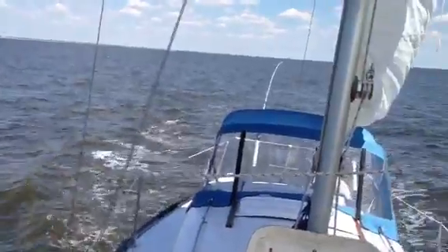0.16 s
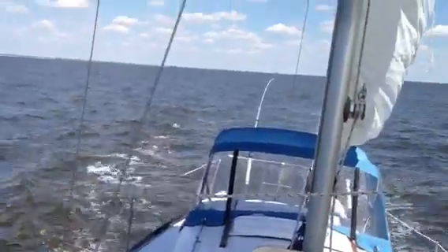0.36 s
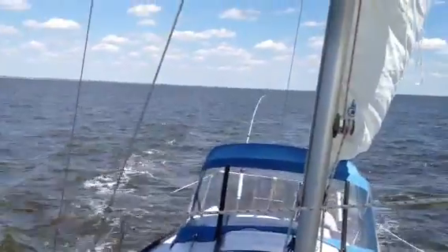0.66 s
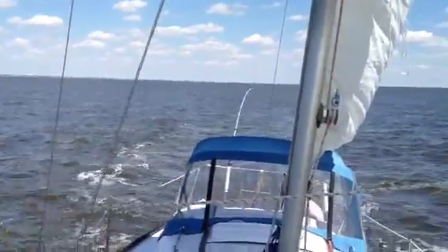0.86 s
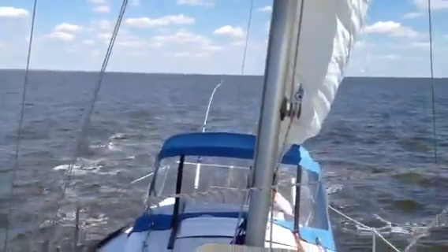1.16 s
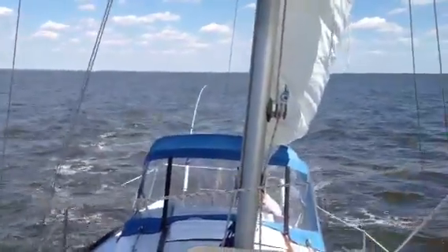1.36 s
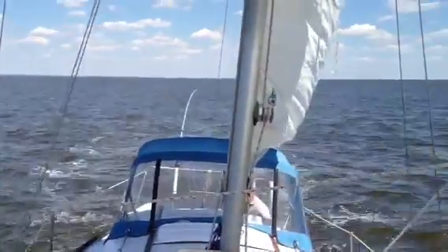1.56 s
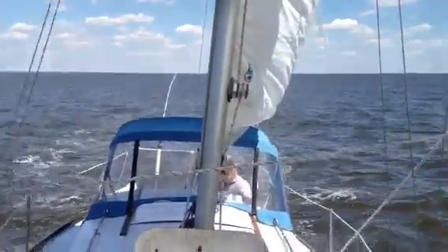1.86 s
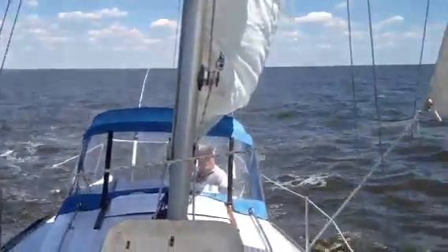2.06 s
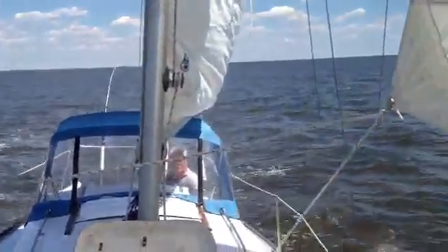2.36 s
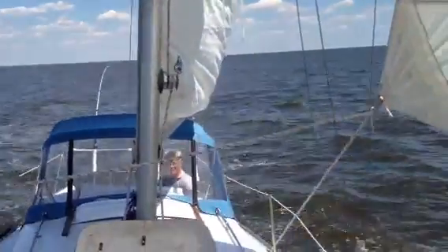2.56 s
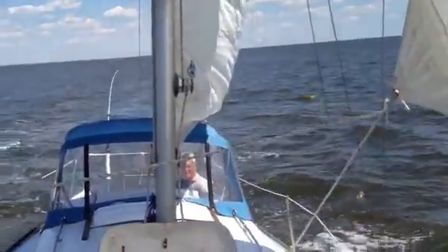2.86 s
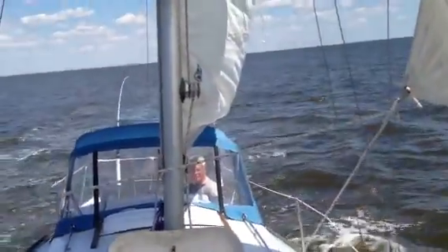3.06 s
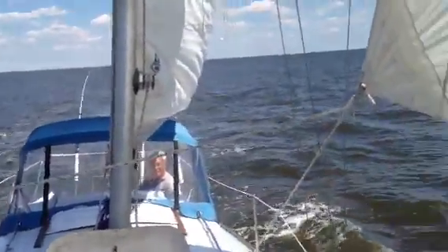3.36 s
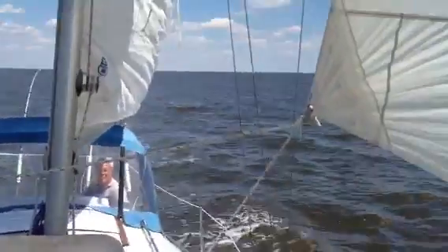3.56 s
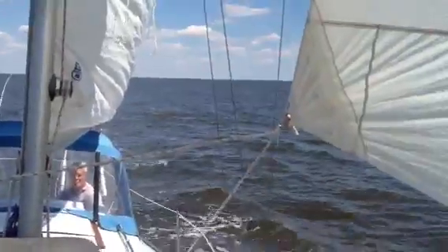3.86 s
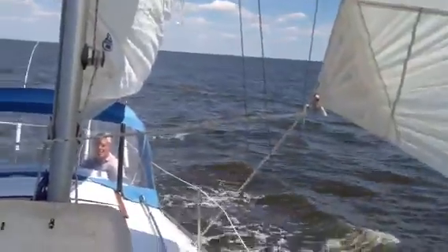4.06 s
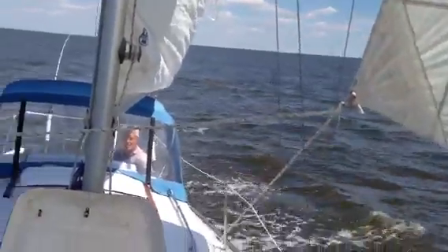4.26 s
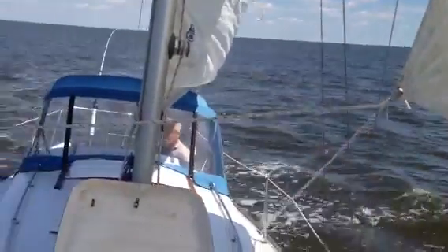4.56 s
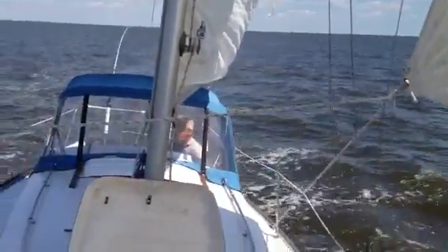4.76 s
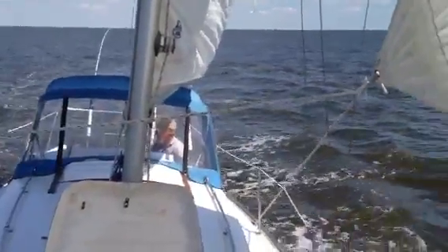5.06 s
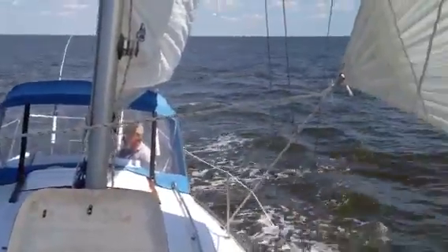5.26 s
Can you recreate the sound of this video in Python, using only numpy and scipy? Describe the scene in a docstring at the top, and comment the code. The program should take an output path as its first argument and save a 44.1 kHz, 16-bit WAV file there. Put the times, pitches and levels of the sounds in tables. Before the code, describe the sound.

Water rushes and splashes along a small sailboat's hull in swelling waves, with gurgling bubbles and wind thumping the microphone early on.

```python
"""Water along the hull of a small sailboat

Close by, water rushes along the hull in a chop: bands of noise and bursting clicks swell with each wave
as wash, foam and spray, over a gurgle of clumped ringing bubbles. Single large bubbles glide up in pitch,
flying drops tick as puffs of treble noise, and a metal fitting in the rigging rattles as scuffed noise
that rings its modes. Wind buffets the small microphone as lumpy low noise and short thumping swings.
"""
import sys
import numpy as np
from scipy import signal
from scipy.fft import rfft, irfft, next_fast_len
from scipy.io import wavfile

SR = 44100
rng = np.random.default_rng(int(sys.argv[2]) if len(sys.argv) > 2 else 0)


def generate_wav(signal):
    """Clip the signal to [-1, 1] and save it as 16-bit WAV at the path in sys.argv[1]."""
    frames = np.transpose(np.atleast_2d(signal))
    scaled = np.clip(frames, -1, 1) * 32767
    pcm = np.round(scaled).astype(np.int16)
    wavfile.write(sys.argv[1], SR, pcm)


N = 238316   # length of the scene in samples


def water(patchy_db, surge_db, burst_db):
    """Bands of foam: smooth noise plus bursting bubbles, each band following the nearest layers of the water."""
    # Centres of gurgle, wash, foam and spray in Hz.
    layer_hz = [600, 1600, 3300, 8000]
    # The water as coloured by the microphone housing. Each row: frequency in Hz, relative gain in dB.
    housing = [(90, -37), (300, -2.5), (1100, 0), (1800, 1.5), (2600, -7), (3400, -5.5), (4500, -18),
               (5400, -18.5), (6900, -9), (10500, -18.5), (11800, -15.5), (12900, -18), (13600, -18.5),
               (15300, -22.5)]
    level_db = -34   # rms of the whole wash
    swing_db = layers()
    layer_index = np.arange(len(layer_hz))
    edges_hz = np.geomspace(60, 19000, 19)
    white = rng.standard_normal((2, N))   # bands use the two noises in turn
    surge, out = drift(22), np.zeros(N)
    for k, (low, high) in enumerate(zip(edges_hz, edges_hz[1:])):
        # where the band's centre lies among the layers: 0 is gurgle, 3 is spray
        place = np.interp(np.log(low * high) / 2, np.log(layer_hz), layer_index)
        nearness = np.clip(1 - abs(place - layer_index), 0, 1)
        band_db = nearness @ swing_db
        # small bubbles burst as clicks of uneven size and either sign, more often in higher bands
        sizes = from_db(0.58 * np.minimum(rng.exponential(1, N), 3.5)) * rng.choice([-1, 1], N)
        chance = .012 * high / SR * from_db(2.5 * surge)
        bursts = rms_one(sizes * (rng.random(N) < chance))
        band_pass = signal.butter(2, [low, high], "band", fs=SR, output="sos")
        band = signal.sosfilt(band_pass, white[k % 2] + from_db(burst_db) * bursts)
        # each band is patchy by itself; spray arrives in sheets, so the treble surges together
        out += band * from_db(band_db + patchy_db * drift(6) + surge_db * place * surge)
    return from_db(level_db) * rms_one(coloured(out, housing))


def layers():
    """Swing in dB of gurgle, wash, foam and spray about their means, lifted as crests slap the hull."""
    # The water rising with each wave; only the swing about each mean counts.
    # Each row: time in seconds, then gurgle, wash, foam and spray in dB.
    wave_levels = [(0.0, -42.5, -43.5, -45.5, -47.5), (.35, -41, -40.5, -44.5, -45),
                   (.84, -47.5, -42, -49.5, -49.5), (1.03, -37, -35.5, -38.5, -42),
                   (1.42, -37, -36, -39, -38.5), (1.65, -42, -39, -43, -44),
                   (1.95, -41.5, -38.5, -44.5, -45), (2.3, -35.5, -34.5, -39, -39),
                   (2.52, -35.5, -36, -40, -40), (2.75, -40, -36.5, -39.5, -40),
                   (3.17, -45.5, -42, -48, -49.5), (3.48, -42, -39.5, -45.5, -48),
                   (3.64, -41, -40, -43, -41.5), (3.79, -34, -32.5, -38.5, -35.5),
                   (3.93, -40, -39.5, -42.5, -42), (4.27, -40.5, -39, -41, -46),
                   (4.5, -44.5, -44, -49, -52.5), (5.02, -47.5, -45, -47.5, -52.5),
                   (5.2, -42, -44, -48, -51.5), (5.4, -43, -41.5, -47, -50.5)]
    # Crests that slap and splash. Each row: start in seconds, length in seconds, rise in dB before reach.
    crest_splashes = [(0.116, 0.21, 5.5), (0.402, 0.12, 2), (1.22, .15, 4.5), (2.546, 0.2, 3),
                      (3.847, 0.057, 0.5), (4.606, 0.1, 2.5)]
    # Share of that rise in gurgle, wash, foam and spray.
    reach = [0.81, 0.42, 1.15, 0.9]
    levels, splash_db = in_time(wave_levels), np.zeros(N)
    for start, length, rise_db in crest_splashes:
        # 65 % of each splash is spent swelling and fading
        add(splash_db, start, rise_db * signal.windows.tukey(round(length * SR), .65))
    return levels - levels.mean(axis=1, keepdims=True) + np.outer(reach, splash_db)


def gurgle(per_s, db):
    """Middle-sized bubbles come in clumps and ring 28 cycles to -60 dB, louder as gurgle and wash swell."""
    sizes = from_db(4.5 * np.minimum(rng.exponential(1, N), 4)) * rng.choice([-1, 1], N)
    born = rng.random(N) < per_s * from_db(5.0 * drift(7)) / SR
    pitches_hz, dealt = np.geomspace(420, 2600, 24), rng.integers(0, 24, N)
    rings = sum(ring(sizes * born * (dealt == k), hz, 28 / hz) for k, hz in enumerate(pitches_hz))
    softened = signal.lfilter([.25], [1, -.75], rings)   # one-pole low-pass
    swell_db = layers()[:2].mean(axis=0)
    return from_db(swell_db + db) * rms_one(softened)


def bubbles():
    """Each large bubble rings briefly while its pitch glides up."""
    # Each row: start in seconds, level in dB before fade-in and decay, starting pitch in Hz.
    large_bubbles = [(1.007, -34, 1640), (1.080, -16.5, 1230), (1.150, -28, 550), (1.232, -24, 620),
                     (1.243, -24, 763), (1.324, -37, 1640), (1.356, -19, 1800), (1.359, -29, 580),
                     (2.319, -28, 910), (2.552, -31, 673), (2.617, -22, 756), (3.044, -26, 1430),
                     (3.472, -31, 800), (3.719, -28, 845), (3.785, -26, 744), (4.269, -26, 1740),
                     (4.639, -58, 1010), (5.002, -30.5, 790)]
    attack_s, cycles_to_60_db = .003, 42
    rise_per_s = 3.2   # share of the starting pitch gained per second
    out, t = np.zeros(N), np.arange(SR // 20) / SR
    for start, db, hz in large_bubbles:
        shape = np.minimum(t / attack_s, 1) * from_db(-60 * t * hz / cycles_to_60_db)
        swing = np.sin(2 * np.pi * hz * (t + rise_per_s * t ** 2 / 2))
        add(out, start, from_db(db) * shape * swing)
    return out


def ticks():
    """Each drop that ticks on the deck is a dying puff of treble noise around its own pitch."""
    # Each row: start in seconds, rms level in dB before the decay, pitch in Hz.
    drops = [(.1535, -30, 8600), (0.721, -33, 8900), (.842, -35, 7950), (1.5912, -25, 7900),
             (1.6014, -26, 7700), (1.6574, -38, 11000), (1.8714, -34, 8600), (2.0364, -26, 7860),
             (2.952, -31, 7300), (2.9726, -29, 7660), (3.1298, -35, 7000), (3.3598, -33, 7250),
             (3.5828, -32, 7900), (3.871, -25, 7100), (4.1974, -35, 13500), (4.2592, -29, 7600),
             (4.328, -31, 7800), (4.406, -41, 13000)]
    t60_s, spread = 0.013, 1.09   # the puff spans pitch / spread to pitch x spread
    out, t = np.zeros(N), np.arange(SR // 20) / SR
    for (start, db, hz), noise in zip(drops, rng.standard_normal((len(drops), len(t)))):
        around_pitch = signal.butter(2, [hz / spread, hz * spread], "band", fs=SR, output="sos")
        puff = rms_one(signal.sosfilt(around_pitch, noise))
        add(out, start, from_db(db) * puff * from_db(-60 * t / t60_s))
    return out


def fitting():
    """Each rattle in the rigging is a short dry scuff of noise that also sets the modes of the metal ringing."""
    # Each row: start in seconds, scuff gain in dB, ring gain in dB, scuff length in seconds.
    rattles = [(1.582, -33.5, -62, 0.042), (2.03, -41, -53, 0.026), (3.535, -36, -50, 0.026)]
    # Modes of the small metal fitting. Each row: frequency in Hz, relative level in dB, 60 dB decay in seconds.
    modes = [(4910, -2, 0.066), (8960, -4, 0.025), (12300, -12, .012)]
    # Lower and upper edge of the dry scuff in Hz.
    scuff_hz = [4000, 13000]
    out, t = np.zeros(N), np.arange(SR // 10) / SR
    scuff_band = signal.butter(2, scuff_hz, "band", fs=SR, output="sos")
    noises = rng.standard_normal((len(rattles), len(t)))
    for (start, scuff_db, ring_db, length), noise in zip(rattles, noises):
        scuff = noise * np.sin(np.pi * np.minimum(t / length, 1) ** 0.71)
        rung = sum(from_db(mode_db) * rms_one(ring(scuff, hz, t60)) for hz, mode_db, t60 in modes)
        dry_scuff = signal.sosfilt(scuff_band, scuff)
        add(out, start, from_db(scuff_db) * dry_scuff + from_db(ring_db) * rung)
    return out


def wind(lumpy_db):
    """Turbulence at the microphone: lumpy low noise, and strong eddies as a few swelling and dying swings."""
    # Spectrum of the buffeting. Each row: frequency in Hz, relative level in dB per Hz.
    buffet = [(15, -72), (25, -45), (49, -27), (95, -6.5), (127, 0), (224, 1.5), (274, 0), (339, -5.5),
              (600, -31.5), (780, -26), (1320, -120)]
    # Single eddies that strike the microphone.
    # Each row: time of the rise in seconds, peak of the swell in dB, pitch in Hz, length in seconds.
    eddies = [(0.004, -20.5, 160, 0.021), (0.155, -29, 141, 0.027), (0.21, -24, 184, 0.028),
              (0.231, -21.5, 177, .022), (0.264, -21.5, 218, 0.01), (0.341, -25, 220, 0.02),
              (0.368, -13.5, 304, 0.0096), (0.384, -15.5, 253, .026), (0.415, -16.5, 170, 0.018),
              (0.442, -22, 212, .031), (0.62, -23.5, 169, 0.028), (0.644, -22, 144, .024),
              (0.664, -20, 218, 0.015), (0.756, -28, 191, 0.026), (0.85, -36, 256, 0.03),
              (0.905, -26.5, 152, 0.03), (1.101, -31.5, 306, 0.029), (1.841, -33, 244, 0.018),
              (2.251, -35.5, 166, 0.036), (2.36, -26.5, 295, 0.016), (2.38, -30, 302, 0.013),
              (2.612, -32, 139, 0.046), (2.884, -30, 160, 0.022), (2.914, -30, 145, 0.028),
              (3.751, -30.5, 270, 0.02), (4.1, -33, 172, 0.026), (4.197, -33, 272, 0.022),
              (4.559, -42, 135, .03)]
    strength = gusts() * from_db(lumpy_db * drift(16.7))
    rumble = rms_one(coloured(strength * rng.standard_normal(N), buffet))
    out = np.sqrt(np.mean(strength ** 2)) * rumble
    for (rise, db, hz, length), turn in zip(eddies, rng.random(len(eddies))):
        t = np.arange(round(length * SR)) / SR
        begins = max(rise - length / 6, 0)   # the listed rise is a sixth into the swell
        add(out, begins, from_db(db) * np.hanning(len(t)) * np.sin(2 * np.pi * (hz * t + turn)))
    return out


def gusts():
    """Strength of the wind: the breeze plus gusts that rise fast, sag while held and then drop away."""
    # Steady breeze on the microphone. Each row: time in seconds, level in dB.
    breeze = [(0, -42), (1.1, -45.5), (1.7, -50.5), (2.4, -47), (3.4, -48), (3.9, -46.5), (4.9, -52.5),
              (5.4, -54.5)]
    # Gusts above it. Each row: start in seconds, time held in seconds, level in dB before rise and sag.
    gust_rows = [(0.0, 0.018, -38), (.15, 0.17, -33), (0.339, 0.17, -26), (.6, 0.073, -36),
                 (.72, 0.068, -37.5), (0.839, 0.019, -38), (.9, 0.023, -41), (1.07, 0.035, -41),
                 (1.83, .03, -52), (2.25, .04, -55), (2.34, 0.056, -38.5), (2.6, 0.03, -46),
                 (2.87, 0.053, -47.5), (3.14, 0.054, -42), (3.47, 0.033, -51), (3.68, 0.23, -44),
                 (4.09, .04, -43), (4.28, .04, -45), (5.2, 0.18, -51)]
    attack_s = 0.019
    sag_db_per_s, release_db_per_s = 48, 500   # the sag goes on through the release
    strength, t = from_db(in_time(breeze)[0]), np.arange(SR // 2) / SR
    for start, held, db in gust_rows:
        fall_db = sag_db_per_s * t + release_db_per_s * np.maximum(t - held, 0)
        add(strength, start, np.minimum(t / attack_s, 1) * from_db(db - fall_db))
    return strength


def microphone_hiss():
    """Steady self-noise of the microphone: white noise given a spectrum."""
    # Each row: frequency in Hz, relative level in dB per Hz.
    hiss_spectrum = [(1000, -38), (4000, -6), (9000, -15), (15000, 0), (20000, -7)]
    return from_db(-66) * rms_one(coloured(rng.standard_normal(N), hiss_spectrum))


def ring(x, hz, t60):
    """A resonant mode set ringing by x, dying by 60 dB in t60 seconds."""
    r, w = from_db(-60 / (t60 * SR)), 2 * np.pi * hz / SR
    # the tiny offset keeps the filter state away from vanishing numbers
    return signal.lfilter([np.sin(w)], [1, -2 * r * np.cos(w), r * r], x + 1e-18)


def drift(rate):
    """Slow chance: noise at every 40th sample through a double one-pole low-pass at rate Hz; spread 1."""
    r = np.exp(-80 * np.pi * rate / SR)
    noise = rng.standard_normal(N // 40 + 2002)
    slow = signal.lfilter([1], [1, -2 * r, r * r], noise)[2000:]   # drop the filter's start-up
    return np.interp(np.arange(N) / 40, np.arange(len(slow)), rms_one(slow))


def coloured(x, spectrum):
    """Impose a spectrum joined on a log-frequency axis."""
    size = next_fast_len(N)
    hz, db = np.transpose(spectrum)
    log_hz = np.log(np.arange(size // 2 + 1) * SR / size + 1)   # 1 Hz added to avoid log of zero
    gain = from_db(np.interp(log_hz, np.log(hz), db))
    return irfft(rfft(x, size) * gain, size)[:N]


def in_time(rows):
    """Each column of a table as a value per sample."""
    s, *columns = np.transpose(rows)
    return np.array([np.interp(np.arange(N) / SR, s, c) for c in columns])


def add(out, s, sound):
    """Mix a short sound in at time s in seconds."""
    at = round(s * SR)
    out[at:at + len(sound)] += sound[:N - at]


def from_db(db):
    """Gain of a level in dB."""
    return 10 ** (np.asarray(db) / 20)


def rms_one(x):
    """Scale to rms 1."""
    return x / np.sqrt(np.mean(x ** 2) + 1e-20)


def scene():
    """Water, rigging and wind at one microphone."""
    wash = water(patchy_db=0.9, surge_db=0.23, burst_db=-8.0)
    wash = wash + gurgle(per_s=250, db=-54.5) + bubbles() + ticks()
    return (wash + fitting() + wind(lumpy_db=2.0))[None]


def record(dry):
    """The microphone adds its hiss and drops the deep bass; the top is cut steeply."""
    low_cut_hz, top_cut_hz = 44, 15330
    low_cut = signal.butter(2, low_cut_hz, "high", fs=SR, output="sos")
    thin = signal.sosfilt(low_cut, dry + microphone_hiss())
    top_cut = signal.ellip(14, .3, 80, top_cut_hz, fs=SR, output="sos")   # 0.3 dB ripple, 80 dB down
    return signal.sosfilt(top_cut, thin)


dry = scene()
out = record(dry)
generate_wav(out)
```